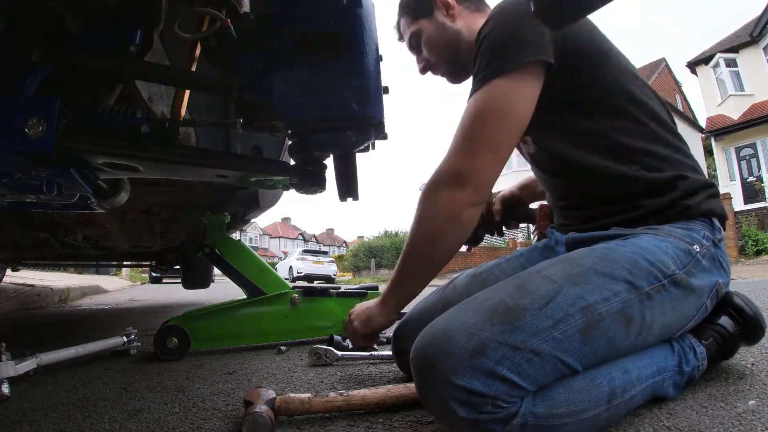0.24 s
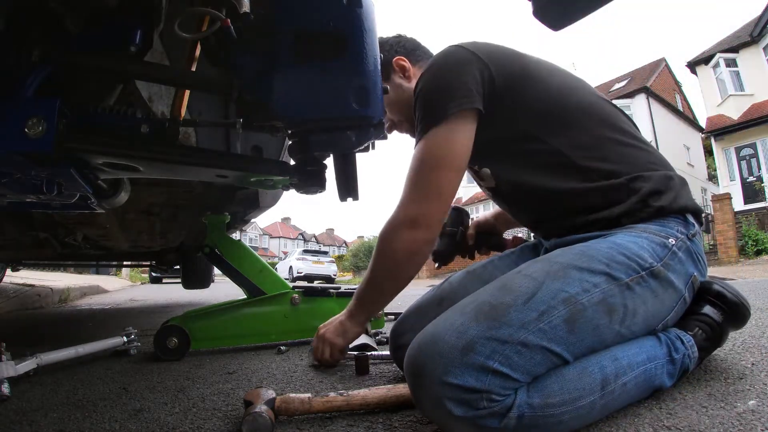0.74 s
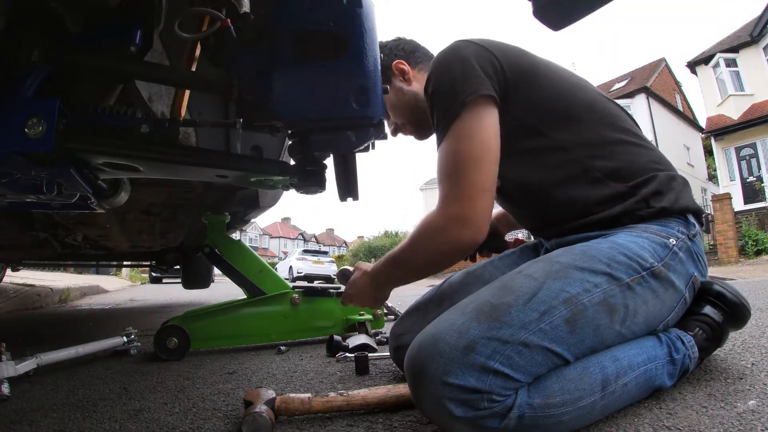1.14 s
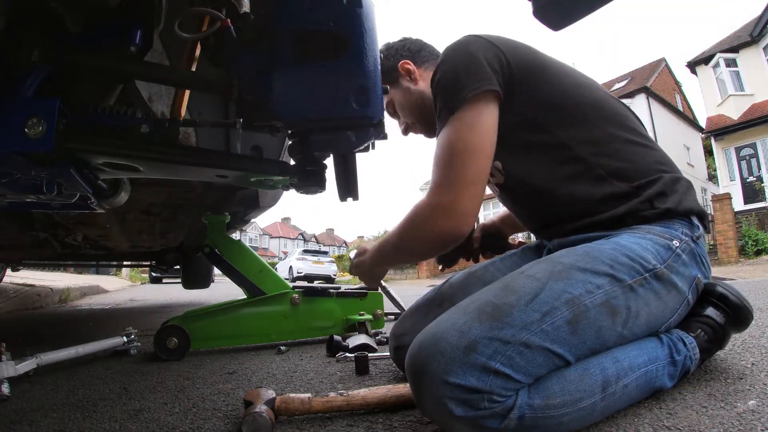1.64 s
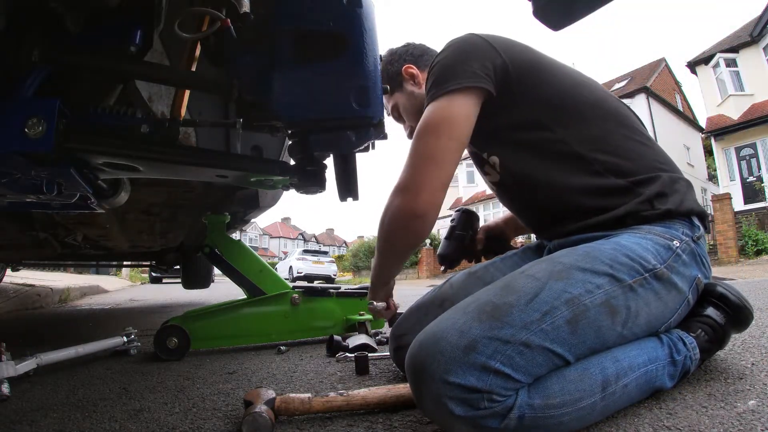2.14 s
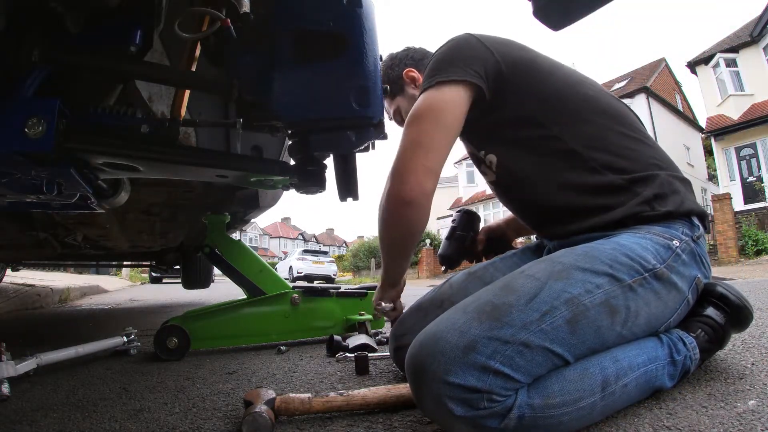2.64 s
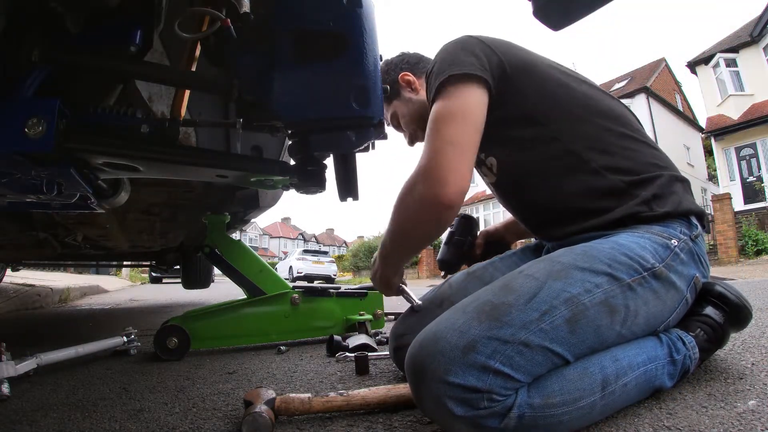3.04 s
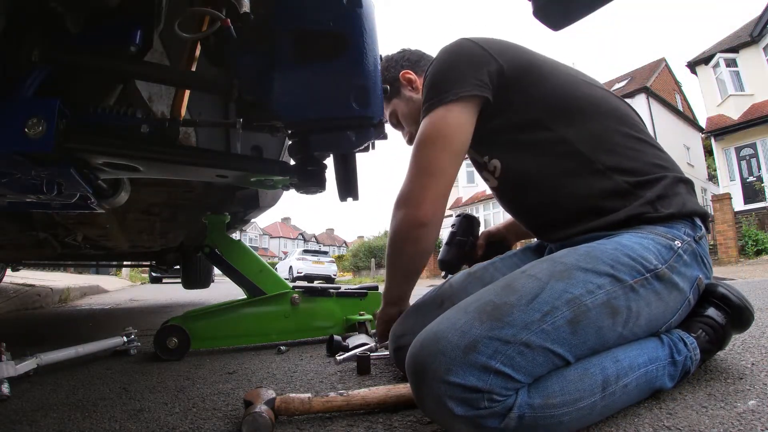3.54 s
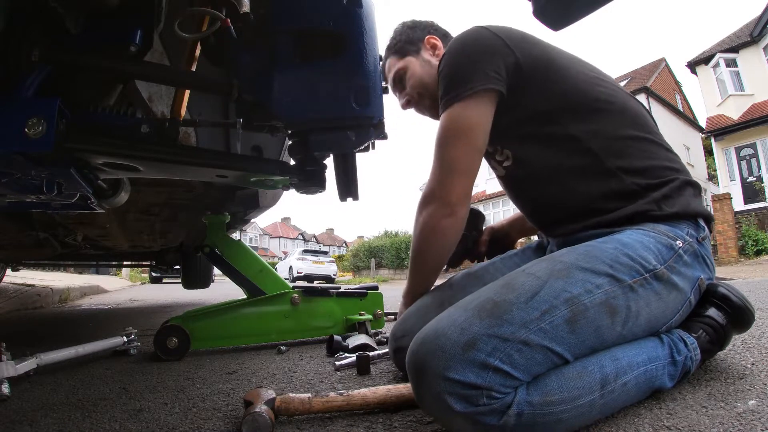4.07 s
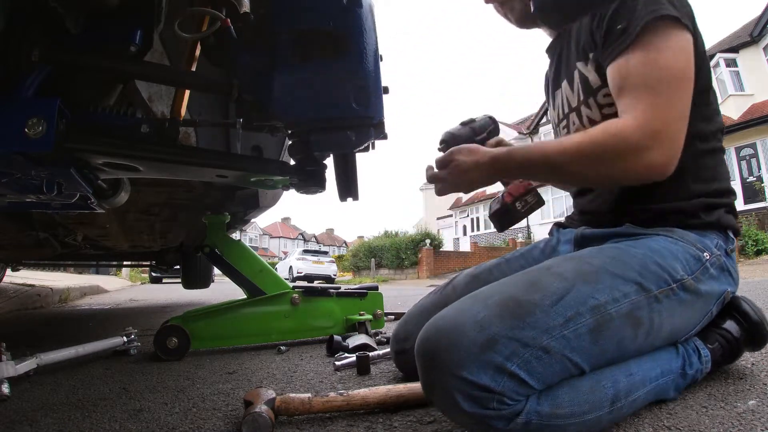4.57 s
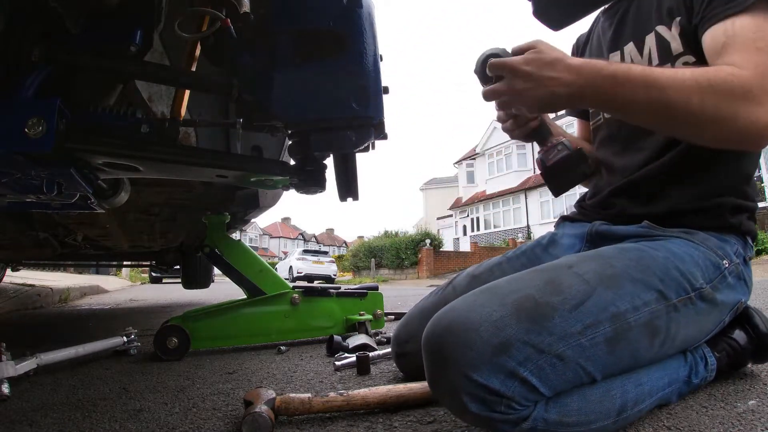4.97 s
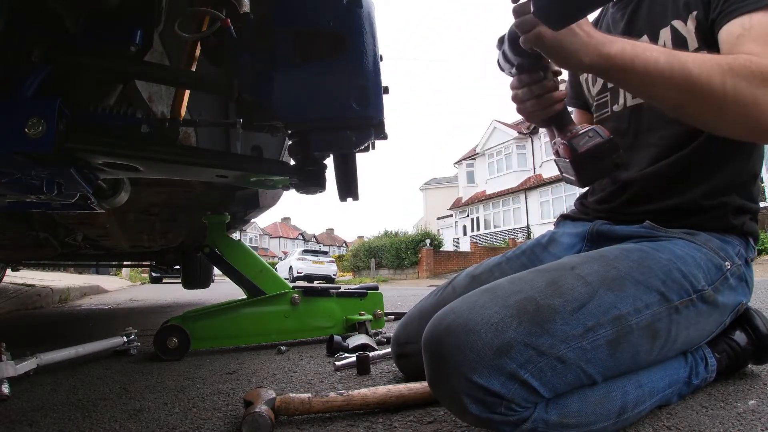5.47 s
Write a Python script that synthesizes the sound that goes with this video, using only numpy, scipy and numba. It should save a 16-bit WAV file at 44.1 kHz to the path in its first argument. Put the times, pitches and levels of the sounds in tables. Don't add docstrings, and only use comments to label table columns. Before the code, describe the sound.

A quiet street with low far-traffic rumble, soft hum and thin air hiss, heard by one microphone in mono. A faint hoarse crow caw ends at the very start. Around 0.15-0.45 s come dull plastic knocks, a short rubber-sole squeak, soft thuds and a firm gritty scuff. From 0.74 to 1.3 s steel tools are picked up: light cracks, a brief spanner ring and bar clinks, with a faint parakeet screech near 1.0. Then mostly street ambience until another screech at 2.8. At 3.02 a spanner drops on asphalt, bright and loud, bouncing and ringing until damped around 3.2. From 3.5 to 3.8 a harder clatter follows: socket bar clanks, sharp ticks, jostled spanner, rolling nut. After 3.9 only small thuds, muffled nut taps, faint scraping and light ticks remain, fading by about 4.6 to hum and thin sparrow chirps until 5.7.

```python
import sys
import numpy as np
from scipy import signal
from scipy.fft import rfft, irfft, next_fast_len
from scipy.io import wavfile
from scipy.ndimage import uniform_filter1d
from numba import njit

SR = 44100
rng = np.random.default_rng(int(sys.argv[2]) if len(sys.argv) > 2 else 0)


def dump(signal):
    limited = np.clip(np.atleast_2d(signal).T, -1, 1)
    pcm = np.round(limited * 32767).astype(np.int16)
    wavfile.write(sys.argv[1], SR, pcm)


def ratio_of_db(decibels):
    return 10 ** (np.asarray(decibels, float) / 20)


N = 251811

# start_s, level_db
TRAFFIC = [(0.0, -51), (0.25, -45.5), (1.0, -42), (1.02, -38), (1.7, -51.5), (1.76, -48), (2.85, -45),
           (3.94, -55), (4.04, -53), (4.56, -53.5), (4.61, -45), (4.76, -55), (4.83, -47.5), (4.96, -56),
           (5.01, -44.5), (5.17, -51), (5.66, -48.5), (5.71, -53)]
# middle_s, width_s, level_db
SWELLS = [(0.449, 0.017, -60), (1.351, 0.51, -52.5), (2.222, 0.037, -36.5), (2.60, 0.82, -51),
          (3.051, 0.09, -48), (4.17, 0.049, -52.5), (4.97, 0.027, -45.5), (5.23, 0.078, -48),
          (5.68, 0.08, -46.5)]
# pitch_hz, level_db (per Hz)
RUMBLE_COLOUR = [(11, -33), (18, -1), (32, -4), (80, 5.5), (130, -11.5), (170, -37), (290, -120)]
HUM_COLOUR = [(65, -32.5), (110, -11.5), (130, -4), (200, 4), (398, -23), (433, -29.5), (600, -28.5),
              (780, -53), (1320, -120)]
AIR_COLOUR = [(240, -23.5), (400, 10), (432, -15), (834, -10.5), (886, -19), (1450, -20.5), (2090, -27),
              (3460, -25.5), (4560, -26), (6680, -25), (7210, -44), (10100, -41), (15500, -58.5)]
# start_s, length_s, top_hz, level_db
ENGINE_NOTE = (3.98, .33, 166, -49)
# time_s, pitch_hz, level_db
CROW = [(0, 565.5, -54.5), (.04, 559.6, -64), (.09, 560, -65.5), (.14, 600, -99)]
# start_s, length_s, top_hz, level_db
PARAKEET = [
    (1.02, .12, 1733, -56),
    (2.795, .118, 1740, -53),
]
# start_s, length_s, top_hz, level_db, end_share (of the top pitch)
SPARROWS = [(2.31, .21, 4500, -69, .76), (2.32, .12, 5320, -71, .98), (4.42, .12, 4600, -69, .98),
            (4.62, .16, 4500, -76, .96), (5.03, .13, 4600, -76, .95), (5.62, .21, 4500, -69, .8),
            (5.63, .12, 5375, -69, .97)]

# start_s, length_s, top_hz, level_db
SQUEAK = (.185, .036, 3000, -48)
# start_s, hold_s, level_db
STROKES = [
    (0.208, 0.17, -66),
    (0.507, 0.22, -75),
    (0.809, 0.022, -50.5),
    (0.896, 0.2, -64.5),
    (1.592, 0.2, -74.5),
    (3.019, 0.22, -61),
    (3.531, 0.32, -70),
    (3.927, 1.16, -73),
]
# pitch_hz, level_db (per Hz)
GRIT_COLOUR = [(290, -34.5), (500, -5.5), (755, -9.5), (909, -5), (1000, -8.5), (1280, -9), (2840, -10.5),
               (6480, -13), (15000, -54)]

# start_s, peak_db
THUDS = [(.157, -41), (.293, -48.5), (.418, -39), (.428, -45.5), (.441, -54), (.477, -47.5), (3.95, -45),
         (4.090, -48), (4.135, -62)]
# start_s, peak_db
SCUFFS = [(.2372, -43), (.3620, -20), (.374, -32), (.384, -44), (.406, -40), (4.128, -58), (4.137, -37)]
# start_s, peak_db
PICKING_CRACKS = [(.7397, -45), (.7662, -28.5), (.7824, -31), (.8124, -32.5), (.8427, -31), (.8771, -31.5),
                  (.9040, -43), (.9634, -37.5), (.982, -40), (1.0171, -30), (1.0270, -31.5),
                  (1.0613, -35.5), (1.0747, -44), (1.1478, -42), (1.2990, -44)]
# start_s, peak_db
SORTING_CRACKS = [(3.022, -23), (3.083, -34), (3.0994, -37), (3.1448, -41.5), (3.1702, -29.5),
                  (3.2251, -42.5), (3.5035, -22), (3.591, -16), (3.638, -16), (3.694, -35), (3.7362, -43.5),
                  (3.7607, -46), (3.9075, -43), (3.914, -34), (4.106, -40.5), (4.337, -52), (4.529, -53.5)]
# start_s, peak_db
TICKS = [(1.2999, -53.5), (2.1021, -57), (3.026, -19.5), (3.039, -24), (3.1147, -25), (3.1891, -29),
         (3.5068, -24), (3.5927, -16.5), (3.6477, -22), (3.6574, -17), (3.709, -13.5), (3.738, -24.5),
         (3.766, -47), (3.7954, -43.5), (4.0335, -49), (4.12, -39.5), (4.3946, -41), (4.5614, -54)]

# pitch_hz, t60_s, grip_share, level_db
CASE = [(326, 0.028, 0, 4.8), (1224, 0.031, 0, 0.5)]
# start_s, peak_db
CASE_KNOCKS = [
    (0.16, -38.5),
    (0.293, -46.5),
]
# pitch_hz, t60_s, grip_share, level_db
TIP = [(6220, 0.025, 0.0013, -1), (6870, 0.015, 0.0011, -1)]
# start_s, peak_db
TIP_PINGS = [
    (3.0288, -5.5),
    (3.5088, -25),
    (0.31, -64),
]

# pitch_hz, t60_s, grip_share, rolling_db, tapped_db
NUT = [(3300, .02, 0, -13, -14), (5530, .022, 0, -2, -16), (6330, .028, 0, -1, -8),
       (7030, .025, 0, -1, -18), (7580, .04, 0, 0, -8), (8040, .022, 0, -1, -14), (9810, .06, 0, -10, 0)]
# start_s, peak_db
NUT_ROLLS = [(3.664, -41), (3.712, -34), (3.718, -41), (3.740, -38), (3.768, -60), (4.1195, -42),
             (4.124, -45.5), (4.131, -52), (4.137, -40), (4.144, -65), (4.397, -48.5)]
# start_s, peak_db
NUT_TAPS = [(3.968, -66), (4.030, -63), (4.325, -64), (4.397, -61), (4.508, -65), (4.522, -66),
            (4.567, -68), (4.58, -63)]

# pitch_hz, t60_s
BAR = [(1220, .12), (2994, .04), (3455, .12), (3498, .12), (4264, .12), (4570, .04), (6230, .12),
       (6587, .14), (7480, .06), (8583, .09), (9076, .12), (10030, .1), (11910, .07), (13980, .08)]
# side_db, end_db, head_db (where struck), brushed_db, picked_db
BAR_STRENGTHS = [(-25.5, -18.5, -24, -21, -10.5), (-32.5, -12, -30, -17.5, -18), (-18.5, -21, 0, -5, -17),
                 (-14, 3.5, -7.5, -9, -2), (-22, 1, -24.5, -11, -22), (-23, -28, -28.5, -11, -13),
                 (-16, -5, -6.5, -9.5, -18), (-1.5, -5.5, -9, -14, -22), (-34, -22.5, -22, -24, -28),
                 (-24, -12, -9, -17, -15), (-36, -10, -27.5, -27, -19), (-23.5, -6, -15.5, -18.5, -12),
                 (-37.5, -29.5, -37, -44, -46), (-38, -22, -33.5, -43, -31)]
# start_s, peak_db
BAR_ON_SIDE = [(1.0291, -22.5), (1.2989, -40.5), (3.5045, -34.5), (3.5080, -15), (3.515, -29),
               (3.6450, -21.5), (3.654, -35), (4.0440, -50)]
# start_s, peak_db
BAR_ON_END = [(3.5915, -31), (3.5970, -25), (3.6040, -23), (3.611, -23), (3.622, -38)]
# start_s, peak_db
BAR_ON_HEAD = [(3.6401, -10.5), (3.708, -46), (3.918, -36.5)]
# start_s, peak_db
BAR_BRUSHED = [(.846, -26.5), (.877, -49), (.906, -42), (0.963, -45), (1.065, -36), (1.072, -25.5),
               (1.080, -48), (3.697, -19.5), (3.720, -23.5), (3.732, -26.5), (3.762, -37.5), (3.795, -47),
               (3.83, -57), (3.865, -55), (4.042, -46), (4.337, -44), (4.527, -55.5), (4.545, -57),
               (4.563, -47)]
# start_s, peak_db
BAR_PICKED = [(1.019, -29), (1.026, -24.5)]
# start_s, loose_s, loose_db_per_s, firm_db_per_s
BAR_GRIP = [
    (1.00, 0.021, 280.8, 1200),
    (3.00, .65, 40, 400),
    (3.77, 0.15, 30, 1400),
]

# pitch_hz, t60_s (when free), grip_share (of the grip's damping)
SPANNER = [(1281, .47, 1.2), (1938, .63, 1.3), (2706, .7, 1.2), (3508, .8, 1.1), (4583, 1.8, 1.6),
           (4615, 1.8, .33), (6671, 1.0, .25), (6686, 1.9, .01), (7004, .7, .72), (9503, .8, .3)]
# lifted_db, first_touch_db, dropped_db, jostled_db
SPANNER_STRENGTHS = [(-28.5, -40.5, -30.5, -46.5), (-21, -43, -29.5, -45.5), (-13, -41.5, -26.5, -29),
                     (-11, -35, -18, -32), (-15, -40, -11, -22), (-4, -40, -15, -12), (-31, -13, -6, -27),
                     (-12, -42, -42, -46.5), (-1, -10, 6, -8.5), (-25, -26, -19.5, -31.5)]
# pitch_hz, t60_s, grip_share
JAWS = [(6118, 1.0, .8), (7477, .6, .8), (8123, .8, .8), (8940, .7, .5), (9071, .9, .4), (9692, 1.0, .8),
        (11206, 3.1, 1.4), (12520, .6, .6), (12792, 3.1, 1.3), (13520, 1.2, .7), (13770, .9, .25),
        (14309, 1.5, .9), (14500, .9, .5), (15411, .2, 1.5)]
# lifted_db, first_touch_db, dropped_db, jostled_db, rocking_db
JAWS_STRENGTHS = [(-3, -10, -11, -18, -15), (-26, -35, -32, -30, -34), (-34, -39, -36, -30, -38),
                  (-22, -37, -28, -27, -31), (-30, -41, -38, -26, -38), (-7, -16, -21, -17, -10),
                  (-44, -48, -36, -34, -19), (-42, -43, -40, -36, -38), (-42, -47, -42, -38, -27),
                  (-46, -41, -36, -36, -37), (-56, -43, -38, -38, -40), (-29, -39, -41, -38, -31),
                  (-44, -46, -45, -40, -45), (-80, -60, -36, -48, -80)]
# start_s, peak_db
SPANNER_LIFTED = [(.7402, -52), (.7680, -48), (.7741, -27.5), (.7830, -27.5), (.7950, -40), (.8080, -40),
                  (.8300, -52), (.8790, -57), (.9070, -54)]
# start_s, peak_db
JAWS_LIFTED = [(.772, -36), (.783, -30.5), (.797, -65), (.812, -30), (.828, -50), (.845, -47)]
# start_s, peak_db
FIRST_TOUCH = [(3.0262, -12)]
# start_s, peak_db
DROPPED = [(3.0390, -18), (3.0500, -17), (3.070, -35.5), (3.084, -23), (3.1170, -31.5), (3.1450, -25),
           (3.174, -35)]
# start_s, peak_db
ROCKING = [(3.1050, -21.5), (3.129, -17), (3.144, -14.5), (3.165, -34.5), (3.185, -24.5)]
# start_s, peak_db
JOSTLED = [(3.6570, -16.5), (3.678, -27), (3.689, -22), (3.699, -14), (3.7370, -31), (3.76, -42)]
# start_s, loose_s, loose_db_per_s, firm_db_per_s
SPANNER_GRIP = [
    (.70, .115, 55, 1200),
    (3.00, .155, 10, 500),
    (3.63, .068, 120, 3000),
]
# start_s, loose_s, loose_db_per_s, firm_db_per_s
JAW_GRIP = [
    (.70, .145, 30, 700),
    (3.00, .19, 5, 850),
    (3.63, .085, 120, 1500),
]

AIR_DB, RUMBLE_UNDER_HUM_DB = -64, -8
UNDERSIDE_T60_S, STREET_T60_S = .13, .6
THUD_HZ, SCUFF_HZ, CRACK_HZ, TICK_HZ = 1440, 2110, 3220, 6400
THUD_T60_S, SCUFF_T60_S, CRACK_T60_S, TICK_T60_S = .18, .034, .06, .12
STROKE_RISE_S, STROKE_FALL_S, STROKE_EDGE_DB = .07, .09, -16
SPANNER_CLOSE_S, JAW_CLOSE_S, BAR_CLOSE_S, LET_GO_S = .05, .04, .04, .03
SAG_POWER = 1.4
SWAY_S, SWAY_PER_S = .00002, 10
BITE_DB = 4


def rms_one(x):
    return x / np.sqrt(np.mean(x ** 2) + 1e-20)


def in_time(rows, silent=None):
    s, *columns = np.transpose(rows)
    t = np.arange(N) / SR
    return [np.interp(t, s, column, silent, silent) for column in columns]


def drift(rate):
    r = np.exp(-80 * np.pi * rate / SR)
    white = rng.standard_normal(N // 40 + 2002)
    slow = signal.lfilter([1], [1, -2 * r, r * r], white)[2000:]
    return np.interp(np.arange(N) / 40, np.arange(len(slow)), rms_one(slow))


def lowpass(x, order, hz):
    return signal.sosfilt(signal.butter(order, hz, fs=SR, output="sos"), x)


def bandpass(x, order, low_hz, high_hz):
    return signal.sosfilt(signal.butter(order, [low_hz, high_hz], "band", fs=SR, output="sos"), x)


def coloured(source, spectrum, patchy_db, rate):
    hz, db = np.transpose(spectrum)
    edges = hz[0] * 2 ** np.arange(0, np.log2(hz[-1] / hz[0]) + 1 / 3, 1 / 3)
    out = 0
    for k, (low, high) in enumerate(zip(edges, edges[1:])):
        band = bandpass(source[k % 2], 2, low, min(high, .45 * SR))
        level_db = np.interp(np.log(low * high) / 2, np.log(hz), db)
        out = out + band * ratio_of_db(level_db + patchy_db * drift(rate))
    return rms_one(out)


def arch(note, start, end, top_at, edge_s, edge_db):
    s, length_s, hz, db = note
    t = np.linspace(0, length_s, 16)
    rising = t < top_at * length_s
    away = np.where(rising, 1 - t / (top_at * length_s), (t / length_s - top_at) / (1 - top_at))
    drop = np.where(rising, (1 - start) * away ** 2, (1 - end) * away ** SAG_POWER)
    level = db + np.interp(t, [0, edge_s, length_s - edge_s, length_s], [edge_db, 0, 0, edge_db])
    return np.transpose([s + t, hz * (1 - drop), level])


def call(rows, partials_db, wobble, rough):
    hz, db = in_time(rows)[0], in_time(rows, -200)[1]
    phase = 2 * np.pi * np.cumsum(hz * (1 + wobble * drift(310))) / SR
    tone = sum(ratio_of_db(level_db) * np.sin(k * phase) for k, level_db in partials_db)
    return ratio_of_db(db) * tone * (1 + rough * drift(220))


def far_walls(x, t60, first_s):
    t = np.arange(SR) / SR
    tail = rng.standard_normal(SR) * ratio_of_db(-60 * t / t60) * (t > first_s)
    return signal.fftconvolve(x, tail / np.sqrt(np.sum(tail ** 2)))[:N]


def car_underside(x, t60, shortest_s, longest_s, dull_hz):
    size = next_fast_len(N + SR)
    hz = np.fft.rfftfreq(size, 1 / SR)
    total = 0
    for k, lag in enumerate(np.geomspace(shortest_s, longest_s, 8)):
        loop = ratio_of_db(-60 * lag / t60) * np.exp(-2j * np.pi * hz * lag) / (1 + 1j * hz / dull_hz)
        total = total + (-1) ** k * loop / (1 - loop)
    return irfft(rfft(x, size) * total, size)[:N]


@njit
def resonate(clicks, swell, loss):
    out, contact, energy = np.zeros(len(clicks)), 0., 0.
    for i in range(len(clicks)):
        contact = contact * swell + clicks[i] ** 2
        energy = energy * loss[i] ** 2 + contact * (1 - swell) + 1e-30
        out[i] = np.sqrt(energy)
    return out


def struck(modes, blow_groups, spread_db, swell_s, grip, bite_db=0):
    out = np.zeros(N)
    t = np.arange(N) / SR + SWAY_S * drift(SWAY_PER_S)
    luck = [rng.standard_normal((len(blows), len(modes))) for blows in blow_groups]
    for m, (hz, t60, share, *levels_db) in enumerate(modes):
        clicks, bites_db = np.full(N, 1e-18), np.zeros(N)
        for blows, level_db, chance in zip(blow_groups, levels_db, luck):
            s, db = np.transpose(blows)
            at = (s * SR).astype(int)
            np.add.at(clicks, at, ratio_of_db(db + level_db + spread_db * chance[:, m]))
            bites_db[at - 64] = bite_db * np.abs(chance[:, m - 1]) * np.clip(share, 0, 1)
        damping_db_per_s = 60 / max(t60, .01) + max(share, 0) * grip
        loss = ratio_of_db(-damping_db_per_s / SR - uniform_filter1d(bites_db, size=128))
        ring = resonate(clicks, np.exp(-1 / (swell_s * SR)), loss)
        out += ring * np.sin(2 * np.pi * hz * t)
    return out


def grip_damping(rows, close_s):
    points, firm = [], rows[0][2]
    for s, loose_s, loose, next_firm in rows:
        points += [(s - LET_GO_S, firm), (s, loose)]
        points += [(s + loose_s, loose), (s + loose_s + close_s, next_firm)]
        firm = next_firm
    return np.maximum(in_time(points)[0], 0)


def with_levels(modes, levels_db):
    return [(*mode, *db) for mode, db in zip(modes, levels_db)]


def chatter(ring, buzz_db):
    loudness = np.sqrt(np.abs(uniform_filter1d(ring ** 2, size=256)))
    buzz = bandpass(rng.standard_normal(N), 4, 3500, 9800)
    return ring + ratio_of_db(buzz_db + 3.7 * drift(40)) * loudness * rms_one(buzz)


def street():
    hum_db, t = in_time(TRAFFIC)[0], np.arange(N) / SR
    swells = sum(ratio_of_db(db) * np.exp(-((t - s) / width_s) ** 2) for s, width_s, db in SWELLS)
    white = rng.standard_normal((3, 2, N))
    deep = ratio_of_db(hum_db + RUMBLE_UNDER_HUM_DB) + swells
    rumble = deep * coloured(white[0], RUMBLE_COLOUR, patchy_db=2.5, rate=2.6)
    hum = ratio_of_db(hum_db) * coloured(white[1], HUM_COLOUR, patchy_db=1.0, rate=1.0)
    hiss = ratio_of_db(AIR_DB) * coloured(white[2], AIR_COLOUR, patchy_db=2.0, rate=8.3)
    course = arch(ENGINE_NOTE, start=1.0, end=0.96, top_at=0.6, edge_s=0.032, edge_db=-12.0)
    engine = call(course, [(1, 3.0), (2, -47.5)], wobble=0.0038, rough=0.041)
    return rumble + hum + hiss + engine


def birds():
    crow = call(CROW, [(1, 2.5), (1.5, -8.0), (2, 3.0), (2.5, -5.0), (3, -3.0), (4, -14), (4.5, -15), (5, -16)],
                wobble=0.038, rough=0.6)
    calls = crow
    for note in PARAKEET:
        course = arch(note, start=.84, end=.68, top_at=.32, edge_s=.04, edge_db=-16)
        calls = calls + call(course, [(1, -14.0), (2, 1.5), (3, -4.0), (4, -17.5)], wobble=.026, rough=1.0)
    for *note, end_share in SPARROWS:
        course = arch(note, start=1.0, end=end_share, top_at=0.33, edge_s=0.035, edge_db=-15.5)
        calls = calls + call(course, [(0.98, 0.0094)], wobble=.025, rough=0.78)
    return calls + ratio_of_db(-4) * far_walls(calls, STREET_T60_S, first_s=.015)


def sole_squeak():
    course = arch(SQUEAK, start=.66, end=.75, top_at=.5, edge_s=.008, edge_db=-12)
    return call(course, [(1, 0.5), (2, -10.0), (3, -12.5), (4, -29), (5, -42)], wobble=0.058, rough=0.34)


def scrape():
    sizes = ratio_of_db(1.9 * np.minimum(rng.exponential(1, (2, N)), 5)) * rng.choice([-1, 1], (2, N))
    grains_per_s = 3000 * ratio_of_db(5 * drift(25))
    grains = sizes * (rng.random((2, N)) < grains_per_s / SR)
    level = 0
    for s, hold_s, db in STROKES:
        stroke = [(s - STROKE_RISE_S, db + STROKE_EDGE_DB), (s, db), (s + hold_s, db),
                  (s + hold_s + STROKE_FALL_S, db + STROKE_EDGE_DB)]
        level = level + ratio_of_db(in_time(stroke, -200)[0])
    return ratio_of_db(4.0) * level * coloured(grains, GRIT_COLOUR, patchy_db=3.0, rate=21)


def cracks():
    kinds = [(THUDS, THUD_HZ, THUD_T60_S), (SCUFFS, SCUFF_HZ, SCUFF_T60_S),
             (PICKING_CRACKS + SORTING_CRACKS, CRACK_HZ, CRACK_T60_S), (TICKS, TICK_HZ, TICK_T60_S)]
    out, t = np.zeros(N), np.arange(SR // 5) / SR
    for rows, hz, t60 in kinds:
        tail = ratio_of_db(-60 * t / 0.034) + 0.73 * ratio_of_db(-60 * t / max(t60, .01))
        shape = (1 - np.exp(-t / 0.00067)) * tail
        for s, db in rows:
            noise = rng.standard_normal(len(t))
            body = signal.sosfilt(signal.butter(2, hz / 1.97, "high", fs=SR, output="sos"), noise)
            body = lowpass(body, 3, min(hz * 1.72, 15000))
            body = lowpass(body, 8, 10300) + .011 * body
            out[int(s * SR):][:len(t)] += ratio_of_db(db - 10.0) * rms_one(body) * shape
    return out


def tool_case(held):
    case = struck(CASE, [CASE_KNOCKS], spread_db=1.0, swell_s=0.00097, grip=held)
    return case + struck(TIP, [TIP_PINGS], spread_db=-1.5, swell_s=0.00023, grip=held)


def loose_nut(held):
    nut = struck(NUT, [NUT_ROLLS, NUT_TAPS], spread_db=4.5, swell_s=0.0015, grip=held, bite_db=BITE_DB)
    return lowpass(chatter(nut, buzz_db=-6), 8, 10400)


def socket_bar(held):
    modes = [(hz, t60, 1, *db) for hz, t60, *db in with_levels(BAR, BAR_STRENGTHS)]
    blows = [BAR_ON_SIDE, BAR_ON_END, BAR_ON_HEAD, BAR_BRUSHED, BAR_PICKED]
    bar = struck(modes, blows, spread_db=1.3, swell_s=0.0012, grip=held, bite_db=BITE_DB)
    return chatter(bar, buzz_db=-17.5)


def spanner():
    shaft = struck(with_levels(SPANNER, SPANNER_STRENGTHS), [SPANNER_LIFTED, FIRST_TOUCH, DROPPED, JOSTLED],
                   spread_db=1.2, swell_s=.004, grip=grip_damping(SPANNER_GRIP, SPANNER_CLOSE_S),
                   bite_db=BITE_DB)
    jaws = struck(with_levels(JAWS, JAWS_STRENGTHS), [JAWS_LIFTED, FIRST_TOUCH, DROPPED, JOSTLED, ROCKING],
                  spread_db=2.5, swell_s=.005, grip=grip_damping(JAW_GRIP, JAW_CLOSE_S), bite_db=BITE_DB)
    return chatter(shaft + jaws, buzz_db=-29.5)


def scene():
    held = grip_damping(BAR_GRIP, BAR_CLOSE_S)
    tools = tool_case(held) + loose_nut(held) + socket_bar(held) + spanner()
    near = sole_squeak() + scrape() + cracks() + tools
    near = near + ratio_of_db(-21) * car_underside(near, UNDERSIDE_T60_S, .0031, .0117, dull_hz=9000)
    far = ratio_of_db(-38) * far_walls(near, STREET_T60_S, first_s=0.017)
    return np.tile(street() + birds() + near + far, (2, 1))


def top_cut(x):
    return signal.sosfilt(signal.butter(12, 16440, fs=SR, output="sos"), x)


def record(dry):
    heard = lowpass(dry, 10, 15300)
    return top_cut(heard)


dry = scene()
out = record(dry)
dump(out)
```